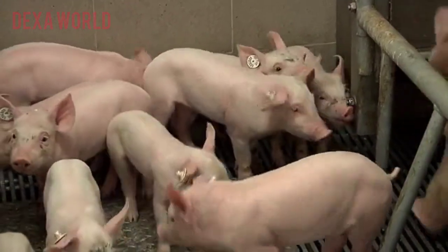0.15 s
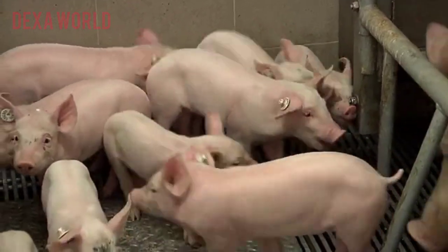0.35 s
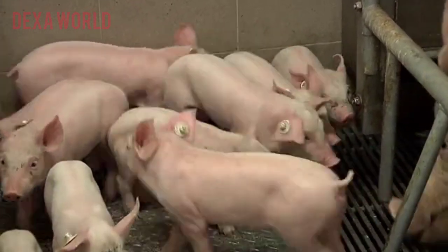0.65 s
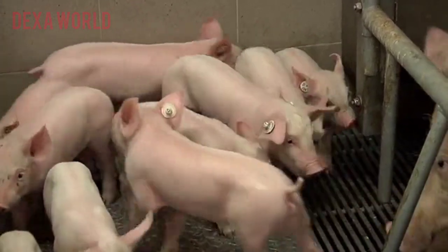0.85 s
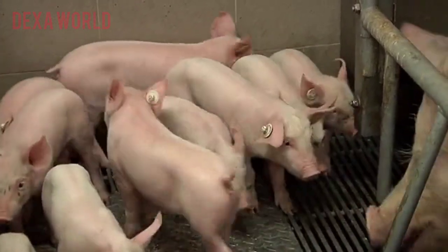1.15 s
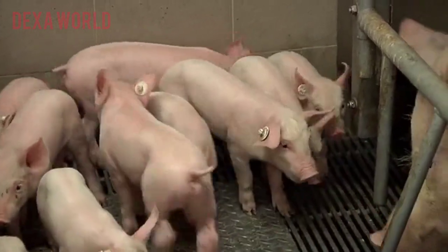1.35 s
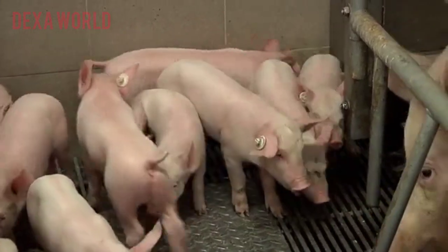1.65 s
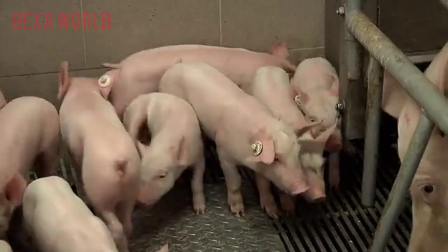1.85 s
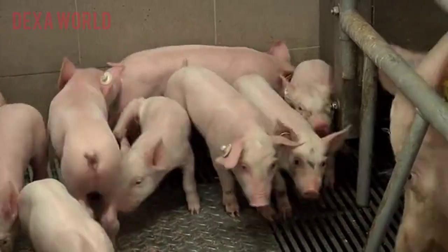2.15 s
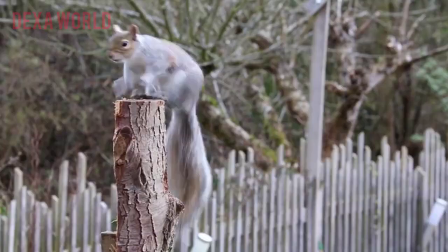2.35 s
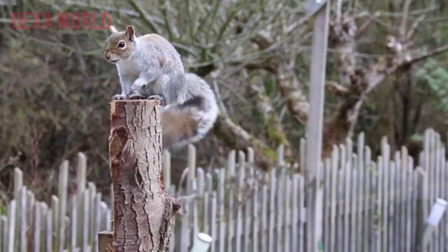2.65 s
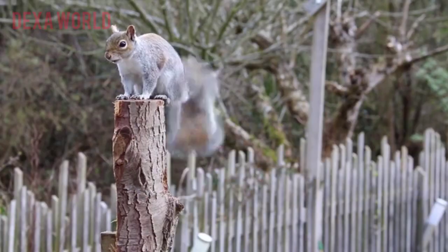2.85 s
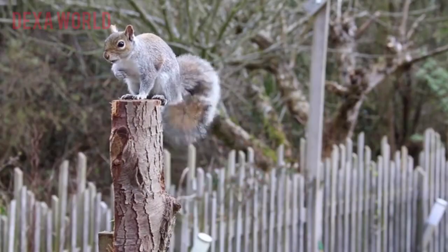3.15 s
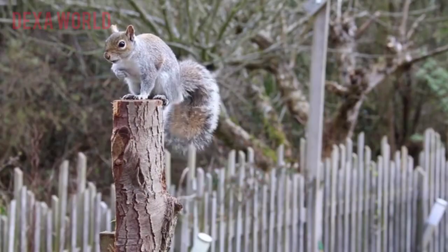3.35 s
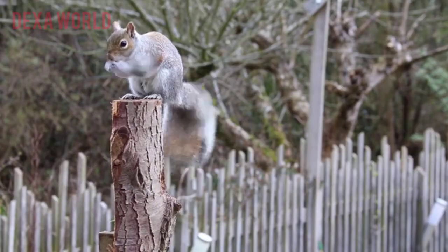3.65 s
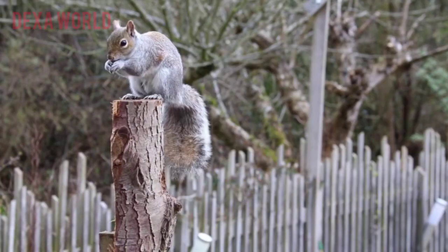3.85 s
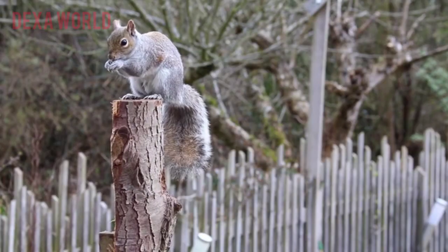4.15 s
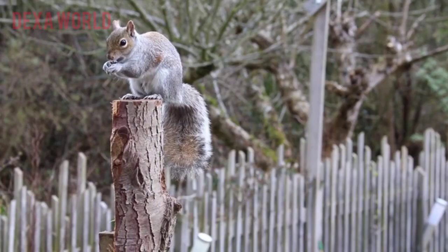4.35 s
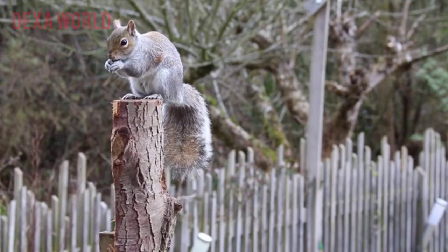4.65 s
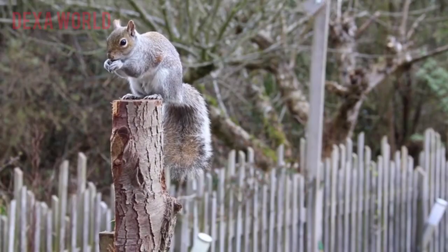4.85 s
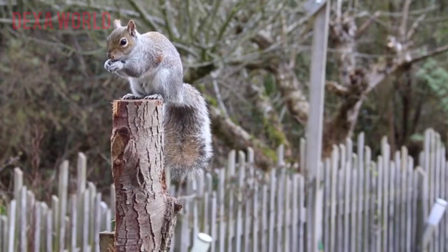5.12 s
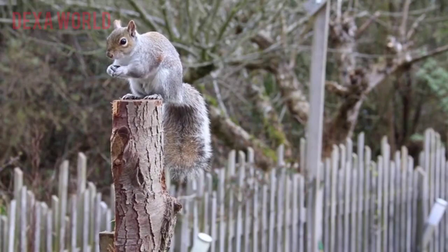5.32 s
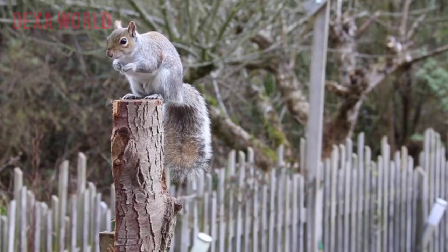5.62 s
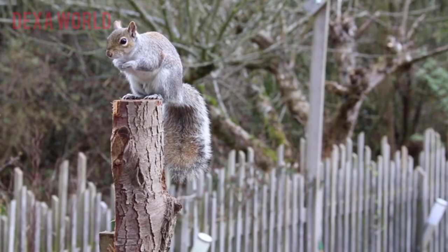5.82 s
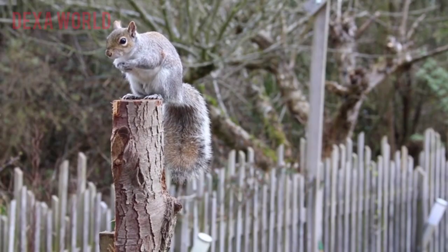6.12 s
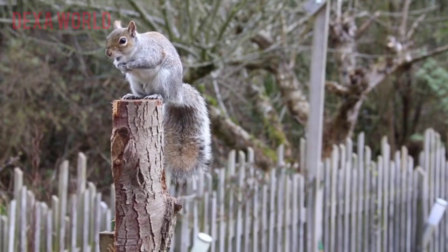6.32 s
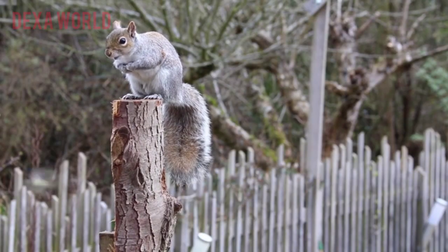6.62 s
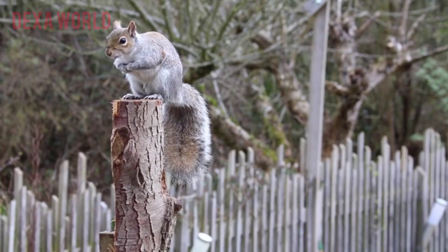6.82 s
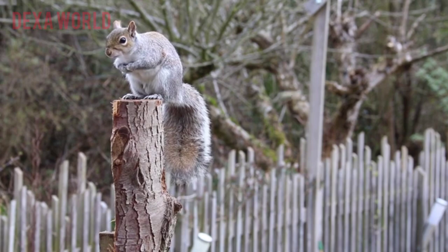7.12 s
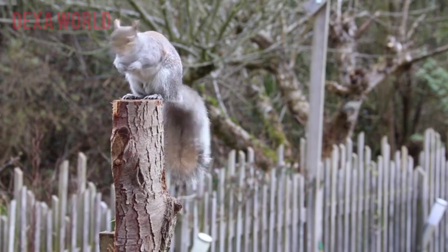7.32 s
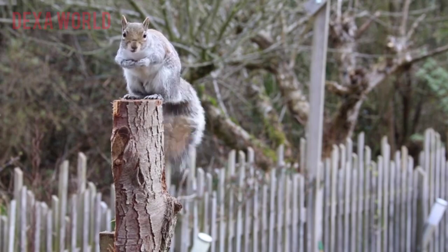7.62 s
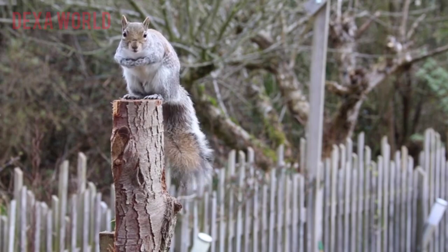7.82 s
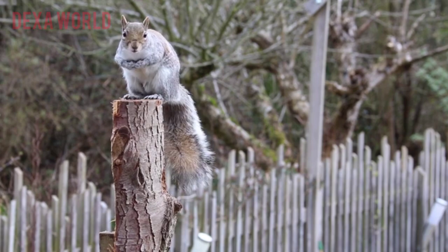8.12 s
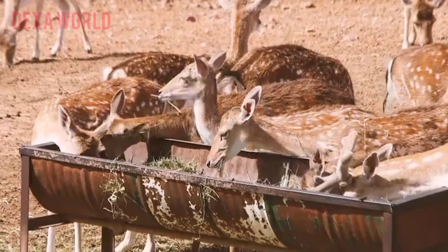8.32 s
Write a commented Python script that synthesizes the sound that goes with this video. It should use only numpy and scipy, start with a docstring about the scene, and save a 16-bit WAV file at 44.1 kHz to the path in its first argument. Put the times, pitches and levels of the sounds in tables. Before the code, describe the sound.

Low, fluttering pig grunts with breathy snorts come first, muffled and in mono over hiss. Then a garden opens up in stereo with a steady low rumble of far traffic. A brief burst of squirrel-like chatter rings among the trees, followed by scattered bird chirps, hoarse calls and two-note whistles. It ends with a sudden cut to near silence.

```python
"""A pig pen, a garden and a quiet paddock, one after another. In the pen, heard dull and in mono over hiss,
a pig grunts: slow pulses of flapping tissue excite the resonances of throat and snout. Faint birds chirp.
In the garden far traffic rumbles, birds whistle amid echoes, and a squirrel-like chatter of arched notes,
shaped by mouth resonances, reverberates among trees. In the paddock only a faint noise of air remains."""
import sys
import numpy as np
from scipy import signal
from scipy.fft import rfft, irfft, next_fast_len
from scipy.io import wavfile
from scipy.ndimage import map_coordinates

SR = 44100
rng = np.random.default_rng(int(sys.argv[2]) if len(sys.argv) > 2 else 0)


def materialize(psi):
    """Save the field psi as 16-bit PCM at rate SR to the path in sys.argv[1].

    A 1-D psi becomes a single channel; in a 2-D psi each row is a channel.
    """
    bounded = np.clip(np.atleast_2d(psi).T, -1, 1)
    quanta = np.round(bounded * 32767).astype(np.int16)
    wavfile.write(sys.argv[1], SR, quanta)


N = 373527
T = np.arange(N) / SR
PEN_END_S, GARDEN_END_S = 2.1895, 8.2


def amp(db):
    return 10 ** (np.asarray(db) / 20)


def unit_rms(x):
    return x / np.sqrt(np.mean(x ** 2) + 1e-20)


def along(points, hz):
    """Interpolation of (Hz, value) points on a logarithmic frequency axis."""
    freqs, values = np.transpose(points)
    return np.interp(np.log(hz + 1), np.log(freqs + 1), values)


def curves(rows):
    """Linear interpolation in time of each column after the first."""
    times, *columns = np.transpose(rows)
    return [np.interp(T, times, column) for column in columns]


def wobble(rate):
    """Random modulation: a smooth curve with `rate` knots a second."""
    knots = rng.standard_normal(int(N * rate / SR) + 4)
    return np.interp(T, T[::8], map_coordinates(knots, [T[::8] * rate]))


def filtered(x, response):
    """Linear filtering: the spectrum is multiplied by a frequency response."""
    n = np.shape(x)[-1]
    padded = next_fast_len(n + SR // 2)
    return irfft(rfft(x, padded) * response(np.fft.rfftfreq(padded, 1 / SR)), padded)[..., :n]


def between(start, end):
    """A gate with hard edges."""
    return np.clip(np.minimum(T - start, end - T) * SR / 20, 0, 1)


def hiss(spectrum):
    """Spectral shaping of white noise; mono, rms 1."""
    gain = lambda hz: amp(along(spectrum, hz) - 90 * (hz < spectrum[0][0] / 2))
    return unit_rms(filtered(rng.standard_normal(N), gain))


# Each row: frequency in Hz, left-right correlation.
CORRELATION = [(60, 1), (180, 0.59), (550, 0.092), (1650, -0.082), (4970, -0.21), (15000, -0.16)]
def stereo_hiss(spectrum):
    """Partial coherence: noise of rms 1 whose channels are alike in the bass."""
    angle = lambda hz: np.arccos(np.clip(along(CORRELATION, hz), -1, 1)) / 2
    noises = np.array([hiss(spectrum), hiss(spectrum)])
    mid, side = filtered(noises, lambda hz: [np.cos(angle(hz)), np.sin(angle(hz))])
    return unit_rms(np.array([mid + side, mid - side]))


# Each row: frequency in Hz, reverberation time as a multiple of decay_s.
DECAY_RATIOS = [(800, 0.93), (2500, 0.94), (6000, 0.51), (12000, 0.32)]
def echoes(x, decay_s, channels):
    """Reverberation: scattered sound decays exponentially, each frequency at its own rate."""
    hz, t, noise = signal.stft(rng.standard_normal((channels, SR)), SR, nperseg=256)
    t60 = decay_s * along(DECAY_RATIOS, hz)[:, None]
    tail = signal.istft(noise * amp(-60 * t / t60), SR, nperseg=256)[1]
    return signal.fftconvolve(x[None], tail / np.linalg.norm(tail[0]), axes=1)[:, :N]


# Recorder hiss that swells and dips. Each row: time in seconds, level of the bright band in dB.
PEN_HISS_LEVELS = [(0, -49.5), (.3, -51), (.39, -57), (.5, -47), (.76, -54.5), (1.28, -54.5), (1.48, -50),
                   (1.62, -57), (2.03, -54.5), (2.18, -50.5)]
# Two noise bands. Each row: frequency in Hz, relative level in dB.
BRIGHT_BAND = [(900, -16), (1800, 2.5), (3000, 3.5), (5000, 1)]
DULL_BAND = [(60, -12.5), (200, -5.5), (1400, -9.5), (2600, -19.5)]
def pen_hiss():
    """Amplitude modulation: two noise bands follow the hiss floor and the pig's breath."""
    floor, snort = amp(curves(PEN_HISS_LEVELS)[0]), snort_envelope()
    dull = amp(-4) * floor + amp(-9.5) * snort + rasp_envelope()
    return (floor + snort) * hiss(BRIGHT_BAND) + dull * hiss(DULL_BAND)


def snout_response(hz, formants, treble_db, chance):
    """Modal superposition: resonances alternate in sign; flipping the upper group leaves a valley."""
    response = 0
    for k, ((centre, width, db), (detune, resize)) in enumerate(zip(formants, chance)):
        upper = centre > 2300
        gain = (-1) ** (k + upper) * amp(db + 1.5 * resize + treble_db * upper)
        damping = 1j * hz * width
        response += gain * damping / ((centre * (1 + .014 * detune)) ** 2 - hz ** 2 + damping)
    return response


def flap(formants, lead_db, treble_db):
    """Impulse response: a flap, led by a duller one and trailed by a puff of air, rings the snout."""
    n = 4096
    hz, t = np.fft.rfftfreq(n, 1 / SR), np.arange(n) / SR
    pulse = 1j * hz / (110 + 1j * hz) / (1 + 1j * hz / 5000) ** 2  # soft tissue blunts each flap
    lead = amp(lead_db) / (1 + 1j * hz / 2500) ** 2 * np.exp(2j * np.pi * hz * .00324)
    puff = rfft(amp(-21.5 - 60 * t / .024) * rng.standard_normal(n)) * 1j * hz / (500 + 1j * hz)
    chance = rng.standard_normal((len(formants), 2))
    nominal_peak = np.abs(irfft(snout_response(hz, formants, 0, 0 * chance))).max()
    spectrum = (puff - pulse * (1 + lead)) * snout_response(hz, formants, treble_db, chance)
    return np.roll(irfft(spectrum), n // 8) / nominal_peak


# Three shapes of throat and snout. Each row: resonance in Hz, bandwidth in Hz, relative gain in dB.
SOFT_FORMANTS = [(724, 58, 3), (1140, 39, 5), (1530, 87, 2), (2500, 220, -9)]
MIDDLE_FORMANTS = [(179, 45, -3.5), (717, 82, -0.5), (1165, 100, 3), (1443, 75, 2), (1730, 108, -4.5),
                   (2077, 42, -4.5), (3090, 245, -5.5), (4310, 380, -16)]
LAST_FORMANTS = [(181.4, 84, -10.5), (720, 110, -8.5), (1176, 103, -0.5), (1445, 110, 0.5),
                 (1874, 120, -3.5), (2945, 300, -1.5), (3490, 310, -12), (4710, 300, -23.5)]
# Each row: start and end in seconds, first and settled pulse gap in ms, first and peak level in dB,
# rise time in seconds, then last pulse's drop, lead pulse's relative level and brightening, all in dB.
GRUNT_TRAINS = [(.414, .462, 4.6, 4.6, -46, -24, .046, 0, -25, 0),
                (.4762, .555, 23.6, 22.6, -23.5, -23, .04, 8, -18, 0),
                (.784, .935, 30, 26.8, -22, -4.5, .065, 1.5, 1, 3),
                (1.6585, 1.818, 29, 23.2, -17, -3, .058, 6, -18, 9)]
# Loose flaps as the third grunt dies. Each row: time in seconds, level in dB.
LOOSE_FLAPS = [(.9335, -17), (.951, -21.5)]
def pig_grunts():
    """Source and filter: slow trains of throat flaps swell, and the loud ones brighten."""
    flaps = [(s, db, MIDDLE_FORMANTS, -np.inf, 0) for s, db in LOOSE_FLAPS]
    shapes = [SOFT_FORMANTS, SOFT_FORMANTS, MIDDLE_FORMANTS, LAST_FORMANTS]
    for (start, end, first_ms, settled_ms, *effort), formants in zip(GRUNT_TRAINS, shapes):
        first_db, peak_db, rise_s, drop_db, lead_db, brighten_db = effort
        gaps_ms = settled_ms + (first_ms - settled_ms) * .3 ** np.arange(12)
        times = start + np.r_[0, np.cumsum(gaps_ms)] / 1000
        times = times[times < end]
        progress = (times - start) / (times[-1] - start)
        swell = np.minimum((times - start) / rise_s, 1) ** 2
        levels = first_db + (peak_db - first_db) * swell - drop_db * (progress == 1)
        leads = lead_db - 27 * (2 * progress - 1) ** 2  # weakest at both ends
        flaps += zip(times, levels, [formants] * len(times), leads, brighten_db * (progress - 1))
    direct = np.zeros(N)
    for s, db, *shape in flaps:
        sound = flap(*shape)
        direct[round(s * SR) - len(sound) // 8:][:len(sound)] += amp(db) * sound
    return direct + amp(-20.5) * echoes(direct, decay_s=.14, channels=1)[0]


def rasp_envelope():
    """Aspiration: breath noise rises and falls in a half sine through each grunt."""
    return sum(amp(peak_db - 34) * np.sin(np.pi * np.clip((T - start) / (end - start), 0, 1))
               for start, end, _, _, _, peak_db, *_ in GRUNT_TRAINS)


# Each row: peak time in seconds, peak level in dB, decay in dB per second.
SNORT_PEAKS = [(0.972, -27.5, 109), (1.849, -30, 172)]
def snort_envelope():
    """Exponential growth and decay of the breath after each loud grunt."""
    return sum(amp(db - np.where(T < s, 190 * (s - T), fade * (T - s))) for s, db, fade in SNORT_PEAKS)


def sing(notes, jitter_hz, echo_db):
    """Frequency modulation: gliding tones, roughened by random pitch jitter, sound amid echoes."""
    jitter, flutter = wobble(350), amp(4.5 * wobble(60))
    direct = np.zeros(N)
    for start, length, from_hz, to_hz, db in notes:
        span = slice(round(start * SR), round((start + length) * SR))
        progress = (T[span] - start) / length
        pitch = from_hz + (to_hz - from_hz) * progress + jitter_hz * jitter[span]
        envelope = amp(db) * np.abs(np.sin(np.pi * np.abs(progress) ** .66)) * flutter[span]
        direct[span] += envelope * np.sin(2 * np.pi * np.cumsum(pitch) / SR)
    return direct + amp(echo_db) * echoes(direct, decay_s=.46, channels=2)


# Each row: start in seconds, level in dB.
CHIRP_STARTS = [(1.115, -49), (1.43, -54), (2.078, -50)]
# Parts of one chirp. Each row: delay and length in seconds, first and last pitch in Hz.
CHIRP_PARTS = [(0, .03, 4150, 4450), (.024, .03, 4300, 3600), (.058, .03, 3200, 3520),
               (.086, .022, 3300, 3200)]
def pen_birds():
    """Pitch glides join into two arches a chirp, high then low."""
    notes = [(s + delay, *glide, db) for s, db in CHIRP_STARTS for delay, *glide in CHIRP_PARTS]
    return sing(notes, jitter_hz=80, echo_db=-9)[0]


# Each row: time in seconds, rumble level in dB, road hiss level in dB.
TRAFFIC_LEVELS = [(2.19, -75, -66), (2.225, -30.5, -39.5), (2.7, -25.5, -37), (3.2, -21.5, -30.5),
                  (4.1, -23, -34), (5.2, -26.5, -36), (6.5, -24, -35.5), (8.2, -24, -34)]
# Two noise bands. Each row: frequency in Hz, relative level in dB.
RUMBLE_BAND = [(15, -32), (25, -16.5), (45, 0), (70, 5.5), (92, -3.5), (109, 5), (124, -2), (220, -13.5),
               (400, -56.5)]
ROAD_BAND = [(100, -28), (250, 0), (1040, -6.5), (2460, -19.5), (5500, -28.5), (11000, -40), (15500, -47)]
def traffic():
    """Slow amplitude modulation of noise: a low rumble and a road hiss, each wavering gently in level."""
    rumble_db, road_db = curves(TRAFFIC_LEVELS)
    rumble = amp(rumble_db + .54 * wobble(3.6)) * stereo_hiss(RUMBLE_BAND)
    road = amp(road_db + .52 * wobble(5.3)) * stereo_hiss(ROAD_BAND)
    return amp([[-.3], [.3]]) * (rumble + road)


# Each row: start and high note's length in seconds, high and low note's level in dB.
TWO_NOTE_WHISTLES = [(2.194, 0.15, -49, -59), (5.926, 0.084, -45, -53.5), (6.603, 0.16, -49, -57),
                     (7.17, 0.11, -46, -60), (7.714, 0.18, -45.5, -66)]
# Each row: start and length in seconds, first and last pitch in Hz, level in dB.
CLEAR_CHIRPS = [(2.208, 0.14, 2005, 1827, -50), (2.557, 0.14, 1833, 2270, -45.5),
                (4.106, 0.048, 2920, 3340, -42), (5.163, 0.052, 4340, 3640, -49),
                (5.234, 0.027, 2630, 2680, -46), (5.255, 0.044, 3800, 3080, -43),
                (5.289, 0.024, 3945, 3390, -43), (5.312, 0.026, 3500, 4800, -44),
                (6.013, 0.043, 3270, 3310, -46), (7.147, 0.037, 3900, 3150, -41.5)]
def clear_birds(high_hz=4060, low_hz=3320):
    """Nearly pure tones: a repeated high-low whistle and gliding chirps."""
    high = [(s, length, high_hz, high_hz, db) for s, length, db, _ in TWO_NOTE_WHISTLES]
    low = [(s + .32, .15, low_hz, low_hz, db) for s, _, _, db in TWO_NOTE_WHISTLES]
    return sing(high + low + CLEAR_CHIRPS, jitter_hz=25, echo_db=1)


# Each row: start and length in seconds, first and last pitch in Hz, level in dB.
HOARSE_CALLS = [(2.33, 0.08, 5500, 5400, -56), (5.5, 0.12, 3000, 3000, -50), (5.597, 0.06, 2790, 3240, -42),
                (5.638, 0.06, 3300, 4220, -44), (6.015, 0.075, 4000, 4350, -46),
                (6.188, 0.062, 4340, 3360, -49.5), (6.265, 0.045, 4700, 5050, -50),
                (7.241, 0.07, 3000, 3080, -42), (7.291, 0.05, 3310, 3950, -43),
                (7.401, 0.06, 3140, 4320, -46), (7.67, 0.06, 5100, 4700, -52),
                (7.948, 0.2, 6250, 6060, -57)]
def hoarse_birds():
    """Deep jitter broadens far calls into hoarse bands; the low ones carry a second, higher strand."""
    strands = [(s + .012, length, 1.2 * from_hz, 1.14 * to_hz, db - 7)
               for s, length, from_hz, to_hz, db in HOARSE_CALLS if from_hz < 3500]
    return sing(HOARSE_CALLS + strands, jitter_hz=190, echo_db=2.5)


# Each row: middle in seconds, top pitch in Hz, source level in dB, upper overtones' gain in dB.
CHATTER_NOTES = [(2.776, 639.4, -12.5, 7), (2.847, 1170, -9, -7), (2.929, 887, -13, -9),
                 (3.024, 820, -14.5, -13), (3.123, 848, -14.5, -13), (3.199, 975, -9.5, -7),
                 (3.282, 1035, -7.5, -13), (3.374, 927, -10, -12), (3.512, 936, -10, -15),
                 (3.603, 948, -9.5, -15), (3.68, 994, -8.5, -7), (3.773, 1136, -7, -7),
                 (3.884, 919, -10, -13)]
# Each row: frequency in Hz, gain of the mouth in dB.
MOUTH_RESPONSE = [(600, -37.5), (1150, -20), (1400, -11.5), (1900, -2.5), (2300, -2.5), (2800, -3),
                  (3400, -5.5), (3700, -17.5), (4300, -26), (4750, -14), (6000, -36.5), (9000, -53)]
def chatter_voice(note_s=.046, rest_hz=470):
    """Formant filtering of arched harmonic notes; returns the direct sound and the treble beamed away."""
    n = round(note_s * SR)
    u = np.linspace(-1, 1, n)  # position in the note, 0 at the top pitch
    peak, onset = (1 - u ** 2) ** 3.5, .38 * (1 - u ** 8) * (1 - u)
    direct, away = np.zeros((2, N))
    shake, scatter = wobble(600), wobble(500)
    for middle, top_hz, db, upper_db in CHATTER_NOTES:
        first = round(middle * SR) - n // 2
        span = slice(first, first + n)
        rasp = (top_hz - 500) / 560  # higher notes are raspier
        arch = top_hz - (top_hz - rest_hz) * np.abs(u) ** 1.75
        pitch = arch + 62 * rasp * (.15 + u ** 2) * shake[span]  # ragged ends
        phase = 2 * np.pi * np.cumsum(pitch) / SR
        rough = rasp * scatter[span]
        for k in np.arange(1, 9, .5):
            halfway = amp(-1) * rasp ** 2 * (k > 3)  # lines between the upper harmonics
            size = amp(db + along(MOUTH_RESPONSE, k * arch)) * (halfway if k % 1 else 1)
            upper = np.clip((k * arch - 2150) / 300, 0, 1) * (k * top_hz > 2400)  # share that turns noisy
            high = (peak + .5 * onset) * amp(upper_db) * np.sin(k * phase + .33 * k * k + 1.85 * rough)
            low = (peak + onset) * amp(2.34 * rough) * np.sin(k * phase + .26 * k * k)
            direct[span] += size * (upper * high + (1 - upper) * low)
            away[span] += upper * size * peak * amp(-2.5) * np.sin(k * phase) * (k % 1 == 0)
    return direct, away


# Hiss under the chatter. Each row: frequency in Hz, relative level in dB.
CHATTER_BAND = [(500, -28), (1000, 0), (3000, 1), (8000, -18.5), (14300, -27.5), (15500, -47)]
def chatter():
    """Reflection and scattering: the notes, a near echo and a long ring among trees, over hiss."""
    direct, away = chatter_voice()
    echo = amp(-16) * np.roll(direct, round(.034 * SR))
    ring = echoes(np.roll(direct + away, round(.02 * SR)), decay_s=.6, channels=1)[0]
    leaves = lambda hz: 2 * hz ** 3 / (hz ** 3 + 2700 ** 3)  # thin leaves scatter treble best
    far = amp(-7.5) * filtered(ring, leaves)
    return (direct + echo + far + amp(-33.5) * hiss(CHATTER_BAND)) * between(2.745, 4.105)


# Each row: frequency in Hz, relative level in dB.
PADDOCK_BAND = [(18, -40), (30, -13), (167, 1.5), (1170, -13), (3150, -24.5), (15000, -29)]
def paddock_air(settle_s=.0071):
    """Broadband noise of quiet air, whose level relaxes quickly to a steady value."""
    elapsed = np.maximum(T - GARDEN_END_S, 0)
    return amp(-64.5 + 11 * np.exp(-elapsed / settle_s)) * stereo_hiss(PADDOCK_BAND)


def scene():
    """Superposition of the sources in each place; the places follow in hard cuts."""
    pen = pig_grunts() + pen_hiss() + pen_birds()
    dull_pen = filtered(pen, lambda hz: hz < 5030) + .0336  # low-passed, with a constant offset
    garden = traffic() + clear_birds() + hoarse_birds() + chatter()
    return (dull_pen * (T < PEN_END_S) + garden * between(PEN_END_S, GARDEN_END_S)
            + paddock_air() * between(GARDEN_END_S, 9))


def record(dry):
    """Hard clipping of the highest peaks, then band limiting."""
    return filtered(np.clip(dry, -.96, .96), lambda hz: hz < 15700)


dry = scene()
out = record(dry)
materialize(out)
```